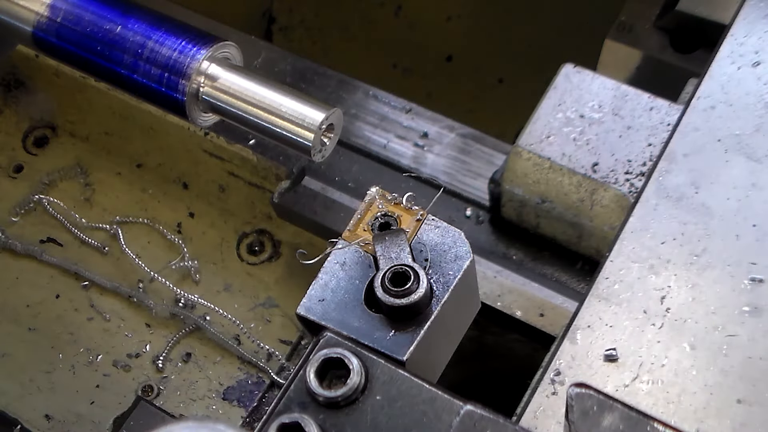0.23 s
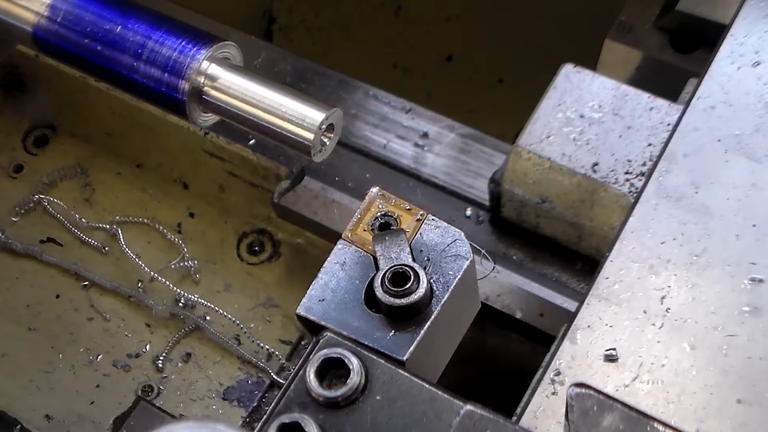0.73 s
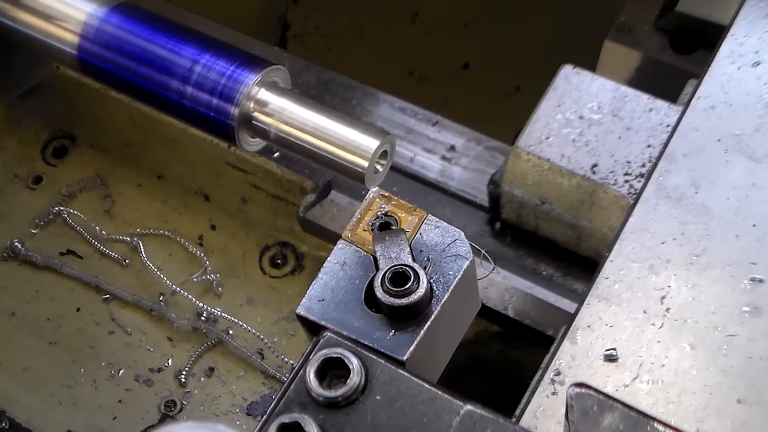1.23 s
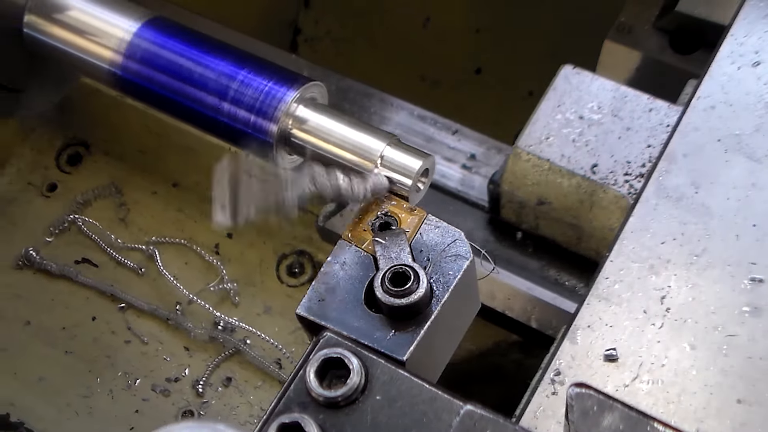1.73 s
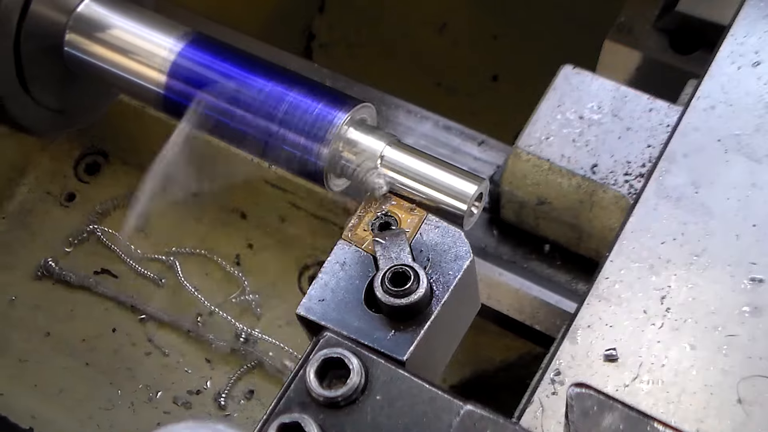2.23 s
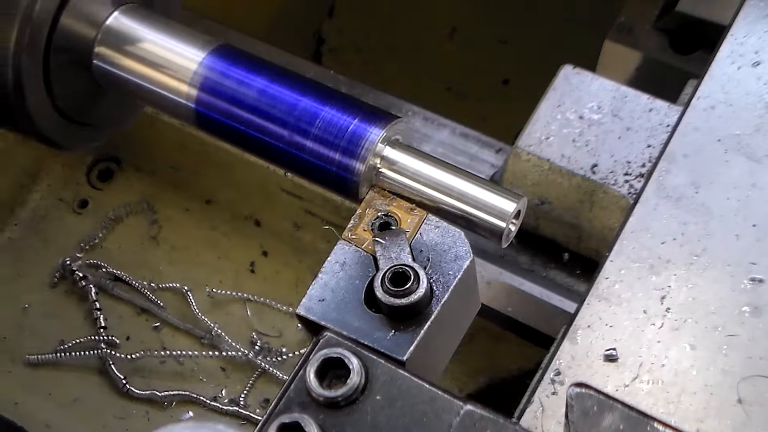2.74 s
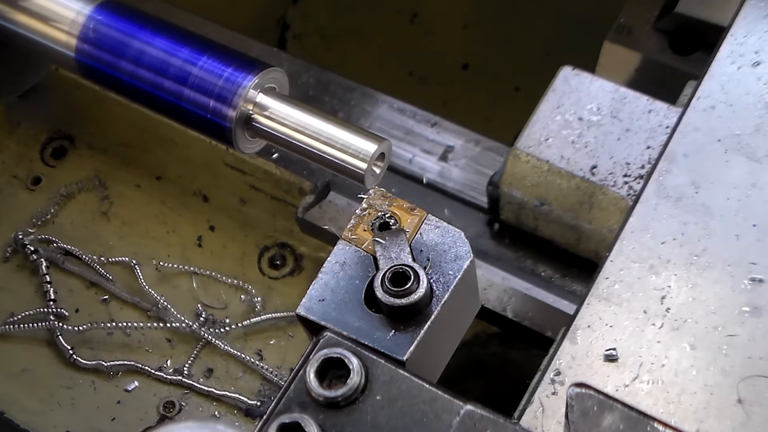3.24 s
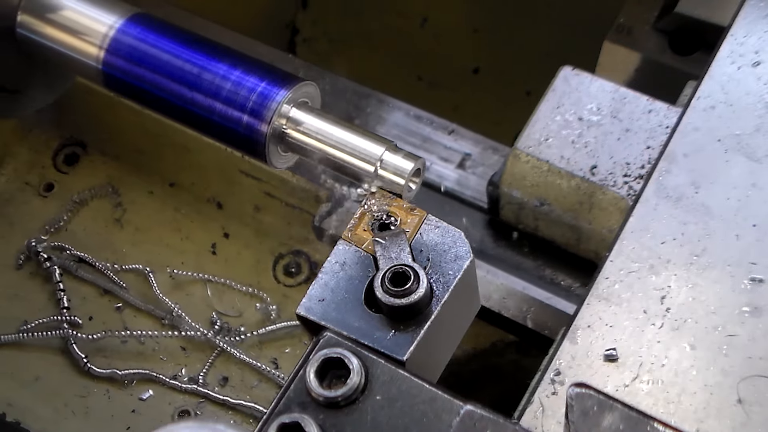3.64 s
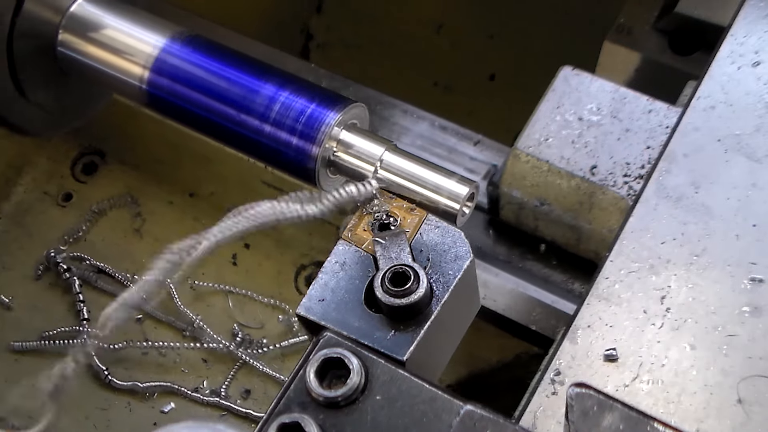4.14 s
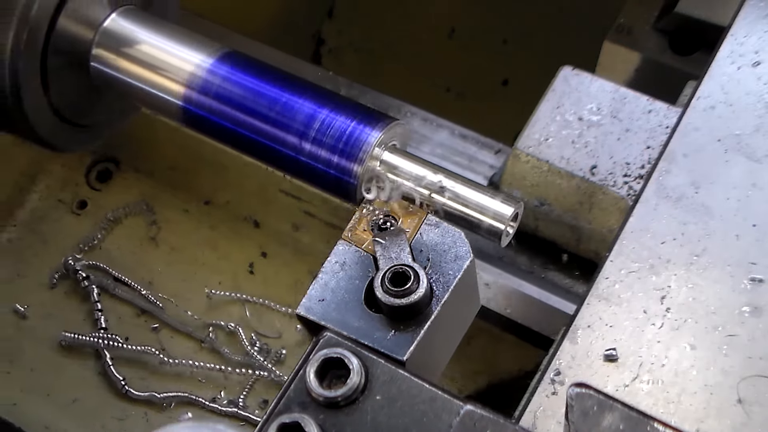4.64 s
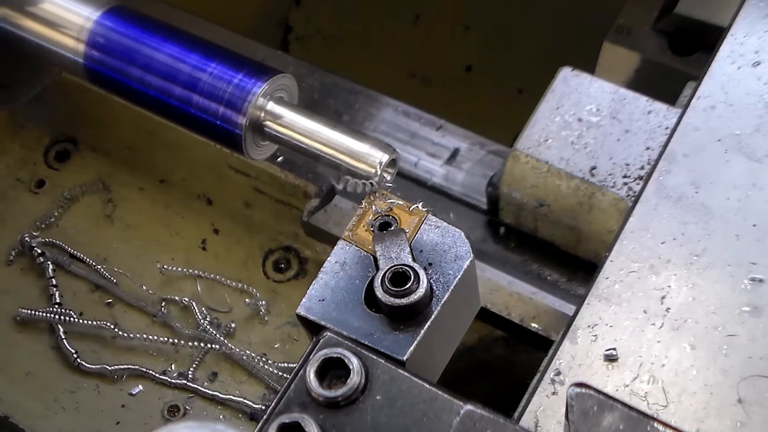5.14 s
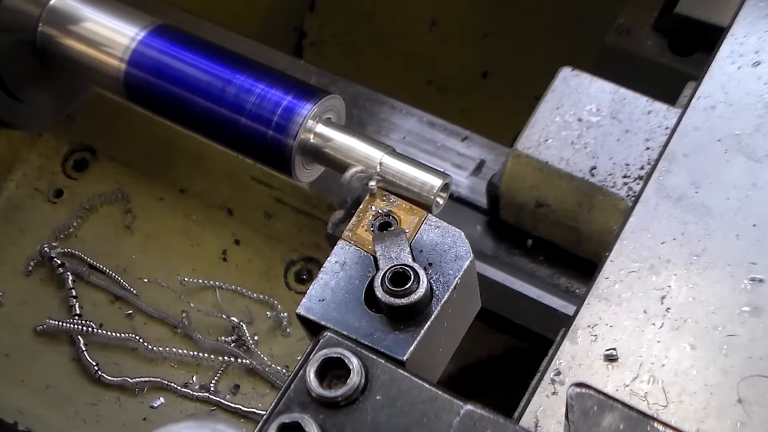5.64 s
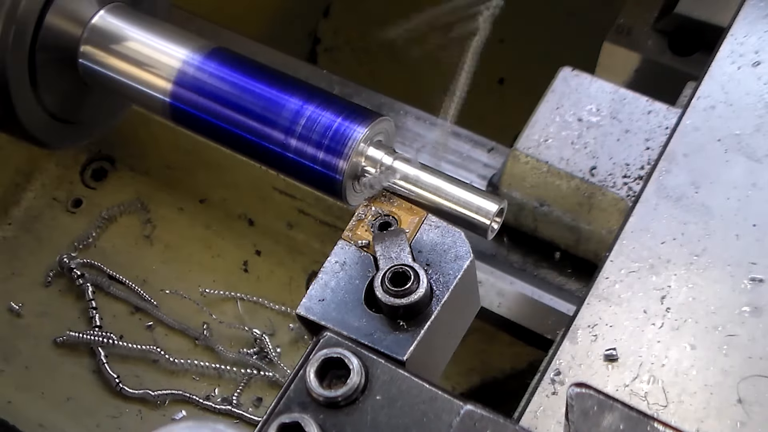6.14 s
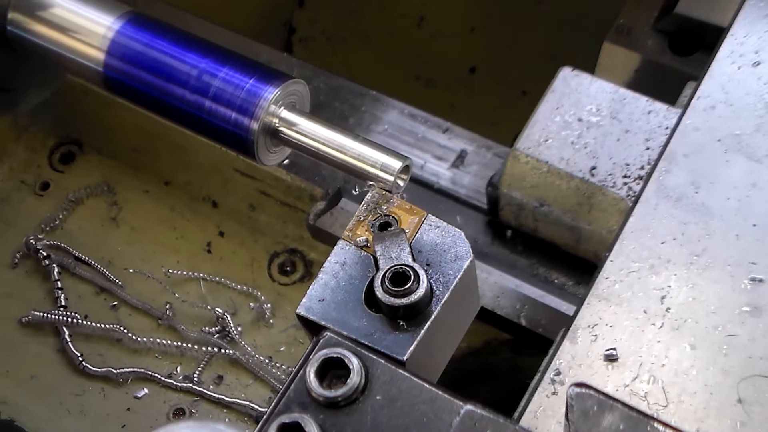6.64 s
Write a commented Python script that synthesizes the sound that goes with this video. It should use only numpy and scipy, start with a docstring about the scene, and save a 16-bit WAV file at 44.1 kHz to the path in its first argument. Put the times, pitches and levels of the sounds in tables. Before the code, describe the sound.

A small lathe idles in a workshop with a quiet rush of air and a fan hum, the microphone close by. A switch clicks and the spindle jumps to speed with a much louder, piercing whine and a bright rolling noise that last to the end. The tool takes three light cuts in metal, ringing thinly each time, with a soft lower carriage whirr in the gaps and a few tiny scrapes around the last cut.

```python
"""A small metal lathe, close up

A cooling fan hums, a relay clicks, and the drive spins up to a shrill whine.
The roughness of the spindle (the turning shaft) partly repeats every turn and rings the metal body.
Three light cutting passes slow the spindle a little and ring the tool holder.
Between passes the carriage, which carries the tool, runs back with a lower whirr."""
import sys
import numpy as np
from scipy.fft import rfft, irfft, next_fast_len
from scipy.io import wavfile
from scipy.ndimage import map_coordinates

SR = 44100
rng = np.random.default_rng(int(sys.argv[2]) if len(sys.argv) > 2 else 0)


def digitize_waveform(pressure):
    """Quantize a signal to 16-bit integers and store it at the path in sys.argv[1].

    Rows of a 2-D input are taken as channels; values are limited to [-1, 1].
    """
    field = np.atleast_2d(pressure).T
    bounded = np.clip(field, -1, 1)
    quanta = np.round(bounded * 32767).astype(np.int16)
    wavfile.write(sys.argv[1], SR, quanta)


N = 303408

# rush of air and motor noise: f/Hz, relative level/dB
AIR_SPECTRUM = [(25, -18), (100, -17.5), (400, -14), (500, -15.5), (1000, -17.5), (1500, -16), (2050, -13),
                (2300, -3.5), (2900, -10), (3700, -14.5), (4800, -10), (6200, -19), (8000, -14),
                (8700, -17.5), (9600, -15.5), (11500, -20.5), (15500, -23)]
# motor tones of the idle machine: f/Hz, level/dB
IDLE_TONES = [(899, -69), (1800, -68), (2256, -65), (2686, -68), (3165, -65), (3266, -56.5), (4571, -61),
              (5401, -67), (13550, -71)]
# ringing of the sheet-metal guards: f/Hz, width/Hz, relative level/dB
GUARD_MODES = [(2676, 130, 6), (4910, 250, 5), (8000, 390, 4), (9400, 330, 7)]
# glides of the feed motor: start t/s, end t/s, start f/Hz, end f/Hz, level/dB
FEED_GLIDES = [(2.33, 2.572, 1055, 1220, -68), (4.979, 7.0, 1001, 1084, -67.5)]
# scrapes of chip and slide: t/s, level/dB, f/Hz, width/Hz, half-length/s
SCRAPE_EVENTS = [(4.818, -53, 1640, 250, .03), (5.393, -45, 3230, 300, 0.023),
                 (5.549, -46, 3658, 700, 0.019), (6.059, -39, 3440, 600, 0.022),
                 (6.44, -57.5, 540, 70, 0.016)]
# ringing of the carriage slide: f/Hz, width/Hz, relative level/dB
SLIDE_MODES = [(1303, 56, -2), (1475, 62, -2.5), (1616, 81, 1), (1990, 220, -11.5), (2203, 18, 15)]
# clicks of the relay contacts: t/s, relative level/dB
RELAY_CLICKS = [(0.7790, -36), (0.7860, -24.5)]
# ringing of the relay housing: f/Hz, width/Hz, relative level/dB
RELAY_MODES = [(1350, 260, -2), (2050, 340, -0.5), (5200, 390, 6.5), (6500, 1600, -4), (8600, 1500, 3),
               (12600, 6600, -13)]
# cutting passes: tool enters t/s, tool leaves t/s, load from 0 to 1
CUTTING_PASSES = [(1.483, 2.774, 1.0), (3.461, 4.766, .92), (5.198, 6.375, .62)]
# ringing of the tool holder: f/Hz, width/Hz, relative level/dB
TOOL_MODES = [(5205, 45, 1.5), (6590, 62, 4.5), (13400, 130, -32)]
# pitch of each whine tone as a shaft order, meaning cycles per turn
TONE_ORDERS = (72, 119, 240, 481, 640, 717)
# the same tones: relative level/dB, change under load/dB, phase ripple/rad, throb under load/dB,
# left minus right/dB, left lead/rad
WHINE_TONES = [(-64, -2, 0.65, 2, -1, -0.013), (-56.5, 0, 0.6, 2.5, 0, 0.097),
               (-40, -6, 0.58, 1.5, 9.5, 2.03), (-37.5, -0.5, 0.76, -0.3, 1.5, 0.058),
               (-52, -2, 2.5, 1, 8.5, 0), (-50, 4.5, 1.8, 11, 3, 0)]
# ringing of the cast metal body: f/Hz, width/Hz, relative level/dB
BODY_MODES = [(1330, 50, -18), (1630, 120, -18), (2000, 110, -21), (2230, 210, -15), (2540, 440, -20),
              (2790, 250, -19), (3210, 170, -16.5), (3560, 560, -18), (4000, 310, -14), (4430, 210, -8),
              (4750, 120, -11), (4970, 170, -12), (5240, 190, -5), (5920, 340, -16), (6230, 60, -8),
              (6660, 140, -7), (7120, 140, -4), (7250, 70, -7), (7740, 130, -12), (8200, 360, -12),
              (8430, 100, -9), (8860, 310, -2), (9480, 710, -11), (10260, 210, -7), (11160, 120, -14),
              (11850, 100, -12), (12110, 290, -10), (13230, 280, -5), (15160, 430, -14), (15630, 170, -8)]
# what the body lets through between its resonances: f/Hz, relative level/dB
BODY_FLOOR = [(40, -31), (400, -28), (700, -31.5), (1150, -33.5), (1300, -26), (2000, -28.5), (3000, -66),
              (4000, -26), (6000, -15.5), (9000, -14.5), (11000, -17.5), (14000, -16.5), (15700, -16.5)]
# beating of bearing balls and motor poles: cycles per turn, depth/dB
BEATS = [(2.11, .55), (4, .45), (5.89, .8), (8, .35)]
# stereo balance: f/Hz, left minus right/dB
BALANCE = [(60, 9), (700, 9.5), (1290, 0.5), (2380, 4.5), (4400, 2), (8120, 2), (15000, -3)]
# sound scattered to the sides: f/Hz, relative level/dB
SCATTER_LEVELS = [(100, -3), (380, -6), (700, -8), (1290, -5), (2380, -13), (4400, -18.5), (8120, -8),
                  (15000, -23)]
# the shop returns bass late, the guards return treble early: f/Hz, random phase step/rad
SCATTER_STEPS = [(600, .3), (2000, .04)]

TURN_HZ = 18.535  # spindle turns a second at full speed


def amp(db):
    """Turn decibels into a gain."""
    return 10 ** (np.asarray(db) / 20)


def unit(x):
    """Scale a signal to an average (rms) size of 1."""
    return x / np.sqrt(np.mean(np.abs(x) ** 2) + 1e-20)


def clock():
    """The time of every sample, in seconds."""
    return np.arange(N) / SR


def curve(rows):
    """Join (time, value) points with straight lines."""
    return np.interp(clock(), *np.transpose(rows))


def ramp(centre_s, length_s):
    """A straight rise from 0 to 1."""
    return np.clip(.5 + (clock() - centre_s) / length_s, 0, 1)


def along(points, hz):
    """Read between (frequency, value) points on a log axis."""
    freqs, values = np.transpose(points)
    return np.interp(np.log(hz + 1), np.log(freqs + 1), values)


def wobble(rate):
    """A smooth curve through `rate` random points a second."""
    return map_coordinates(rng.standard_normal(int(N * rate / SR) + 4), [clock() * rate])


def filtered(x, response):
    """Give each frequency in x the gain response(hz)."""
    size = next_fast_len(N + 8192)
    return irfft(rfft(x, size) * response(np.fft.rfftfreq(size, 1 / SR)), size)[..., :N]


def resonances(modes, hz):
    """Power gain of an object's modes, the pitches at which it likes to ring."""
    return sum((amp(db) / (1 + (2 * (hz - centre) / width) ** 2)) ** 2 for centre, width, db in modes)


def ringing_noise(modes):
    """Noise of size 1 that rings at the given modes."""
    return unit(filtered(rng.standard_normal(N), lambda hz: np.sqrt(resonances(modes, hz))))


def each_turn(turns, strengths, size=16384):
    """Random bumps that come round every turn, with strengths for 1, 2, ... cycles per turn."""
    orders = strengths * np.exp(2j * np.pi * rng.random(len(strengths)))
    surface = unit(irfft(np.r_[0, orders], size))
    return np.interp(turns, np.arange(size) / size, surface, period=1)


def spread(x):
    """Place a sound mostly left of centre and widen it with scattered reflections."""
    def side_gain(hz):
        lean = np.tanh(np.log(amp(along(BALANCE, hz))) / 2)
        phase = np.cumsum(rng.normal(0, along(SCATTER_STEPS, hz)))
        return lean + amp(along(SCATTER_LEVELS, hz)) * np.exp(1j * phase)
    side = filtered(x, side_gain)
    return np.array([x + side, x - side])


def stereo_tone(tone, pan_db, lead_rad):
    """Split a complex tone in two, the left louder by pan_db and ahead by lead_rad."""
    half = np.sqrt(amp(pan_db)) * np.exp(.5j * lead_rad)
    return np.sqrt(2) * np.real([tone * half, tone / half])


def cutting_load(bite_s=.06, release_s=.14):
    """In each pass the tool bites, holds its load and runs out of the metal."""
    return sum(load * ramp(enters, bite_s) * (1 - ramp(leaves, release_s))
               for enters, leaves, load in CUTTING_PASSES)


def spindle_speed(half_speed_s=.861, time_constant_s=.011):
    """Share of full speed: an S-shaped rise, then steady."""
    return .5 + .5 * np.tanh((clock() - half_speed_s) / (2 * time_constant_s))


def shaft_turns(load):
    """Count the turns of the spindle, which slows a little under the cut."""
    sag = .0018 * load + .0002 * wobble(5)
    return np.cumsum(TURN_HZ * spindle_speed() * (1 - sag)) / SR


def fan_and_hum(load, blade_hz=449.5, idle_fan_db=-58.5, air_db=-47.5):
    """Fan blade tone, wavering motor tones and rushing air; all sink back once the drive runs."""
    running = ramp(.93, .13)
    fan_db = idle_fan_db + running * (-4 + .5 * wobble(7.6)) - 1.3 * load
    fan = amp(fan_db) * np.exp(1j * (2 * np.pi * blade_hz * clock() + wobble(6.1) / 10))
    hum = sum(amp(db) * np.sqrt(2) * np.sin(2 * np.pi * hz * clock() + .5 * wobble(31))
              for hz, db in IDLE_TONES)
    rush = filtered(rng.standard_normal(N), lambda hz: amp(along(AIR_SPECTRUM, hz)))
    air = amp(air_db) * unit(rush * amp(1.1 * wobble(70)))
    return stereo_tone(fan, pan_db=.76, lead_rad=0) + spread((air + hum) * amp(-5 * running))


def guards(db=-57.5, rustle_db=1.2):
    """The sheet-metal guards ring with a light, shifting rustle."""
    return amp(db + rustle_db * wobble(16)) * ringing_noise(GUARD_MODES)


def feed_motor(waver_rad=1.16, fade_s=.06):
    """The motor that moves the tool adds a thin, unsteady whine, rising through each move."""
    out = np.zeros(N)
    for start, end, start_hz, end_hz, db in FEED_GLIDES:
        hz = curve([(start, start_hz), (end, end_hz)])
        envelope = amp(db) * ramp(start, fade_s) * (1 - ramp(end, fade_s))
        out += np.sqrt(2) * envelope * np.sin(2 * np.pi * np.cumsum(hz) / SR + waver_rad * wobble(90))
    return out


def scrapes():
    """The metal chip and the slide scrape in brief swells of narrow noise."""
    return sum(amp(db) * np.exp(-((clock() - t) / half_length) ** 2) * ringing_noise([(hz, width, 0)])
               for t, db, hz, width, half_length in SCRAPE_EVENTS)


def carriage(load, db=-52, surge_db=1.5, shudder_db=-43.5):
    """The slide shudders as the drive starts, and whirrs whenever the cutting load is off or light."""
    moving = (1 - load).clip(0, 1)
    shudder = amp(shudder_db) * curve([(.855, 1), (.895, 0)])
    return ringing_noise(SLIDE_MODES) * (amp(db + surge_db * wobble(60)) * moving + shudder)


def relay(ring_s=.035, snap_s=.0019, snap_db=5, gain_db=-6):
    """An electric switch clicks twice, each time with a snap and a brief ring of its housing."""
    envelope = np.zeros(N)
    for t, click_db in RELAY_CLICKS:
        age = np.maximum(clock() - t, 0)
        decay = amp(-60 * age / ring_s) + amp(snap_db - 60 * age / snap_s)
        envelope += (age > 0) * amp(click_db + gain_db) * decay
    return envelope * ringing_noise(RELAY_MODES)


def cut(load, db=-43, chip_db=2):
    """The chip slides over the cutting tip and rings the tool holder."""
    return load * amp(db + chip_db * wobble(80)) * ringing_noise(TOOL_MODES)


def drive_tone(load, hz=2651.3, db=-39.5, load_db=-2, flutter_db=.5):
    """The powered motor sings one clean note, whatever its speed."""
    on = curve([(.858, 0), (.88, 1)])
    phase = 2 * np.pi * hz * clock() + .057 * wobble(30)
    envelope = on * amp(db + load_db * load + flutter_db * wobble(40))
    return stereo_tone(envelope * np.exp(1j * phase), pan_db=4.4, lead_rad=-.13)


def whine(turns, load, flutter_db=.5, swell_db=.7, torque_db=5.5, low_cut_hz=1300):
    """Drive tones follow the shaft; the turning force ripples within each turn and roughens them."""
    orders = np.arange(1, 13)
    speed = spindle_speed()
    acceleration = 4 * speed * (1 - speed)
    # once a turn the slightly off-centre metal bar presses harder and the tone dips
    dip = np.sin(np.pi * turns) ** 4
    out = np.zeros((2, N))
    for order, (db, load_db, ripple, throb_db, pan_db, lead) in zip(TONE_ORDERS, WHINE_TONES):
        phase = 2 * np.pi * order * turns + ripple * each_turn(turns, 1 / orders)
        phase += .07 * wobble(300) + .93 * np.sqrt(1 - speed) * wobble(1600)  # shakier at the start
        bumps = each_turn(turns, (orders > 1) / orders)
        throb = throb_db * (.5 + .5 * load) * (bumps / 2 - 2 * dip)
        swing = unit(amp(throb + flutter_db * wobble(210) + swell_db * wobble(4.42)))
        # high tones build up with speed; low ones swell while the motor speeds up
        build = speed ** 2 if order > 240 else amp(torque_db * acceleration)
        envelope = amp(db + load_db * load) * build * swing
        out += stereo_tone(envelope * np.exp(1j * phase), pan_db, lead)
    return filtered(out, lambda hz: 1 - np.exp(-(hz / low_cut_hz) ** 10))


def spindle(turns, load, db=-31, load_db=-1.56, drift_db=.22, grit_db=1, repeat_share=.42):
    """Rolling roughness rings the metal body; it grows with speed and the cut damps it."""
    surface = each_turn(turns, np.ones(int(SR / 2 / TURN_HZ)))
    rough = np.sqrt(repeat_share) * surface + np.sqrt(1 - repeat_share) * rng.standard_normal(N)
    body = filtered(rough, lambda hz: np.sqrt(amp(along(BODY_FLOOR, hz)) ** 2
                                              + resonances(BODY_MODES, hz)))
    beats_db = sum(depth * np.sin(2 * np.pi * (order * turns + rng.random())) for order, depth in BEATS)
    rise = np.minimum(spindle_speed() / .52, 1)  # fully loud at about half speed
    level_db = db + load_db * load + drift_db * wobble(4)
    rolling = unit(rise * body * amp(beats_db + grit_db * wobble(500)))
    return spread(rolling * amp(level_db))


def scene():
    """The machine idles, then the spindle runs through its three passes."""
    load = cutting_load()
    turns = shaft_turns(load)
    powered = ramp(.847, .006)
    tool_and_slide = powered * (cut(load) + carriage(load))
    small_parts = spread(tool_and_slide + guards() + feed_motor() + relay() + scrapes())
    background = fan_and_hum(load) + small_parts
    return background + powered * whine(turns, load) + drive_tone(load) + spindle(turns, load)


def record(dry, top_hz=15780):
    """Cut away the very highest treble."""
    return filtered(dry, lambda hz: hz < top_hz)


dry = scene()
out = record(dry)
digitize_waveform(out)
```